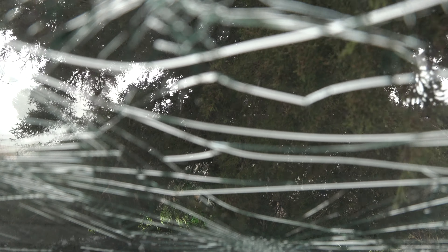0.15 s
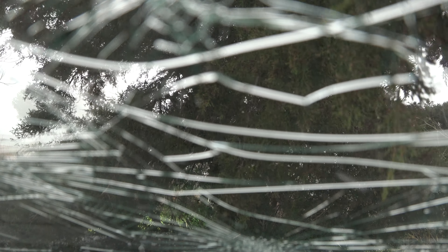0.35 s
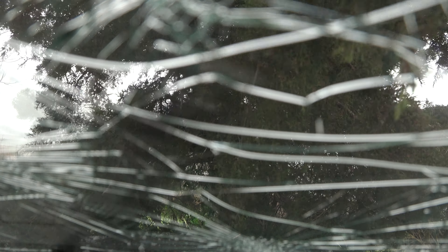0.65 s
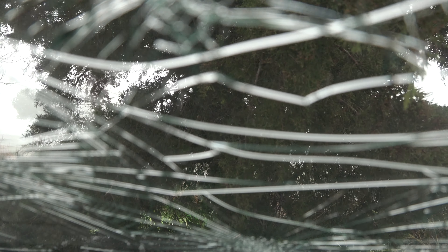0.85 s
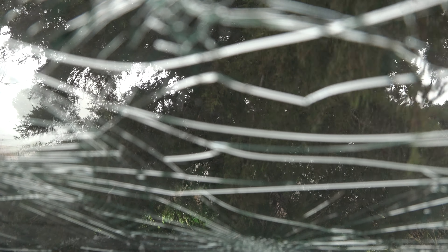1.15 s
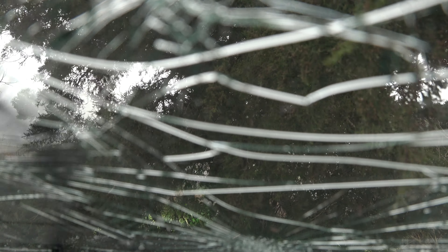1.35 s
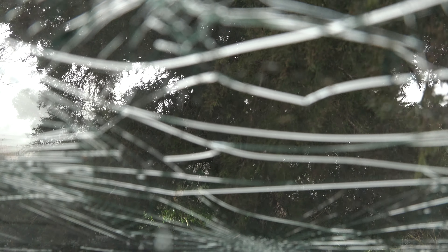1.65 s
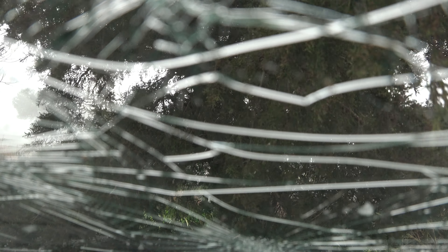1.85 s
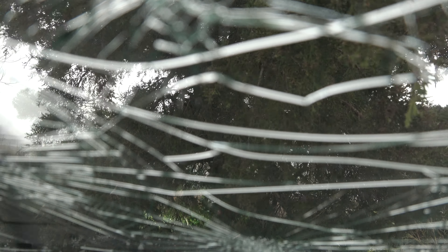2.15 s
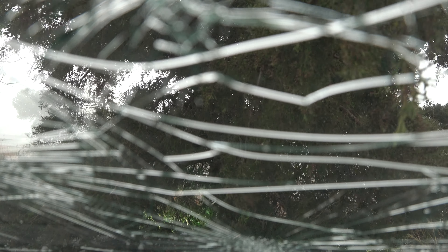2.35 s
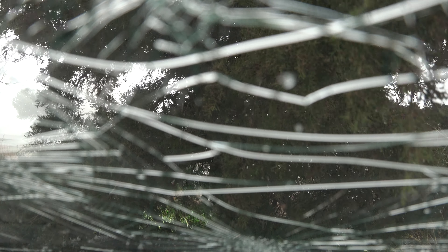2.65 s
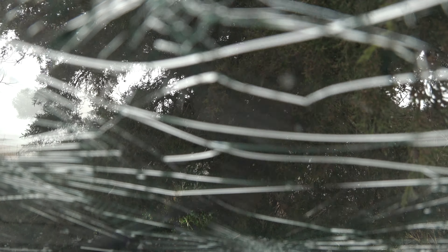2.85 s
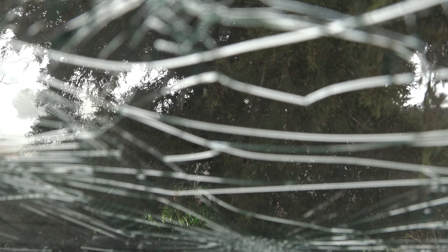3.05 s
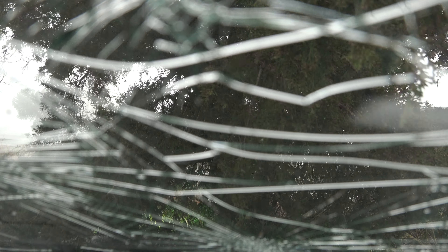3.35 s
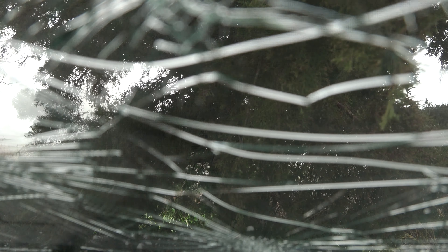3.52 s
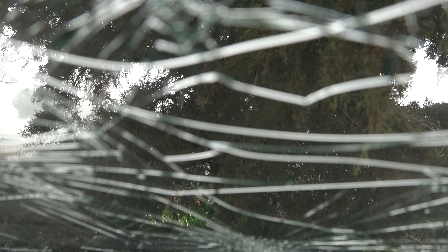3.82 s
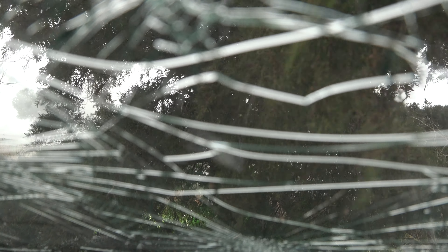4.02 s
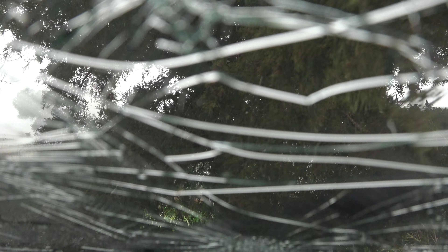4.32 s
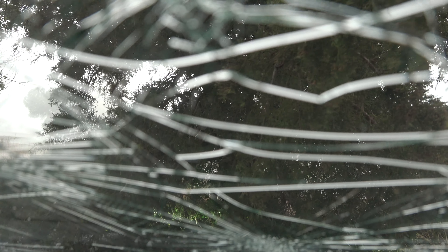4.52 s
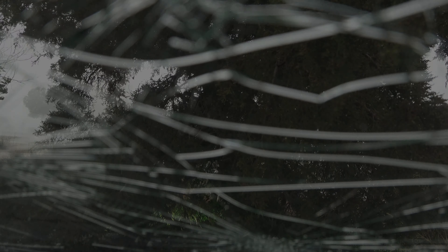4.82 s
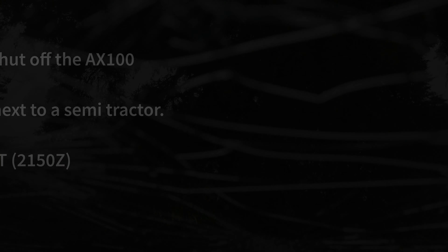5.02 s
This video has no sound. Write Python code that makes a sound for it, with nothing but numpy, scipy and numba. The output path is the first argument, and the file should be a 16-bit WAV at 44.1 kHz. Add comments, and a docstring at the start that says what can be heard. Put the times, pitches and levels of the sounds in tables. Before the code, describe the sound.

Hailstones hammer a car's metal roof and cracked windscreen in a dense irregular clatter of sharp cracks and hollow booms, heard from inside.

```python
"""Hailstones hammer on a car in a storm, heard inside behind the cracked windscreen: each one excites
a treble crack (noise bands), panel knocks (damped modes) and a roof boom (low modes that build up late).
Random small hail and drops patter between the stones by the same means, over a noise wash of rain.
A fast limiter holds the big blows, so their treble comes first and the boom swells after; the end fades out."""
import sys
import numpy as np
from scipy import signal
from scipy.io import wavfile
from scipy.ndimage import uniform_filter1d
from numba import njit

SR = 44100
rng = np.random.default_rng(int(sys.argv[2]) if len(sys.argv) > 2 else 0)


def pcm_store(signal):
    """Save signal as 16-bit PCM."""
    levels = np.round(np.clip(np.atleast_2d(signal), -1, 1) * 32767)
    wavfile.write(sys.argv[1], SR, levels.astype(np.int16).T)


N = 228283  # samples
OPPOSITE = np.array([[1], [-1]])  # signs of a left-right difference


def undb(db):
    """Level to amplitude: 20 dB is a factor of ten."""
    return 10 ** (np.asarray(db) / 20)


def read(table, hz):
    """Interpolation of an (f/Hz, value) table on a log-frequency axis."""
    table = np.array(table)
    return np.interp(np.log(hz), np.log(table[:, 0]), table[:, 1])


def walk(rate):
    """Random modulation: straight lines join random levels 1 / rate s apart; spread near 1.9."""
    hold = int(SR / rate)
    steps = np.repeat(rng.standard_normal(N // hold + 1), hold)
    return 2.27 * uniform_filter1d(steps, hold)[:N]


# Balance of the two channels: f/Hz, left over right level/dB
LEFT_OVER_RIGHT = [(60, 1), (110, -4), (200, -0.5), (380, 1.5), (700, 3.5), (1290, 3), (2380, 1),
                   (4400, -2), (8120, 1), (15000, -0.5)]


def channel_tilt(hz):
    """Interchannel level difference, split evenly between left and right."""
    return undb(read(LEFT_OVER_RIGHT, hz) / 2 * OPPOSITE)


# What the two channels do not share: f/Hz, side against mid level/dB
SIDE_OVER_MID = [(60, -18.5), (700, -16.5), (2400, -33.5), (4400, -51), (6500, -3.5), (8500, 1.5),
                 (10200, 13), (12000, -14), (15000, -23)]


def band_noise(hz, octaves):
    """Band-limited noise with partial interchannel coherence: shared mid of rms 1, opposed side."""
    edges = hz * 2 ** (np.array([-.5, .5]) * octaves)
    edges = np.minimum(edges, [.44 * SR, .48 * SR])
    band = signal.butter(2, edges, "band", fs=SR, output="sos")
    mid, side = signal.sosfilt(band, rng.standard_normal((2, N)))
    both = mid + undb(read(SIDE_OVER_MID, hz)) * side * OPPOSITE
    return channel_tilt(hz) * both / mid.std()


# Spectral density of the rain wash: f/Hz, relative level/dB per Hz
RAIN_SPECTRUM = [(18, -48), (30, -3), (127, 7), (540, -12), (1430, -14.5), (2290, -17.5), (4780, -13.5),
                 (10200, -48.5), (14400, -46.5), (16000, -54)]
RAIN_DB = -43.5  # rms level of the wash ahead of the limiter


def rain():
    """Superposition of many unresolved impacts: rain on the bodywork as noise, each band flickering alone."""
    out = 0
    for hz in 35 * 2 ** np.arange(0, 9, 2 / 3):
        level = undb(read(RAIN_SPECTRUM, hz) + 3.4 * walk(25))
        out = out + level * np.sqrt(hz) * band_noise(hz, 2 / 3)  # bandwidth grows with hz
    return undb(RAIN_DB) * out / out.std()


# Base strength of small hail and rain drops: t/s, level/dB before the random spread
PATTER_STRENGTH = [(0, -36), (1.2, -36), (2.4, -33.5), (3.5, -41), (4.3, -40.5), (4.85, -48)]
PATTER_PER_S = 220  # sets the count, from the full length
PATTER_SPREAD_DB = 3.3  # scale of the logarithmic size spread
FADE_START_S, FADE_END_S = 4.496, 4.835


def patter():
    """Random impact process: uniform arrival times, many small grains and few larger ones."""
    count = int(PATTER_PER_S * N / SR)
    u = rng.random((count, 4)).T
    g = rng.standard_normal((count, 2)).T
    s = u[0] * FADE_END_S
    # the offset in the logarithm bounds the largest grain
    size = np.interp(s, *np.transpose(PATTER_STRENGTH)) - PATTER_SPREAD_DB * np.log(0.089 + u[3])
    same = np.ones(count)
    crack_hz = 2500 * 2 ** (2.2 * u[1])
    sizzle_db = -12 + 3 * g[0]
    knock_db = size - 12 + 3 * g[1]
    knock_hz = 400 * 2 ** (1.53 * u[2])
    # the constants: knock octaves, boom Hz, build-up ms, crack ring share, body ring share
    return np.array([s, size - 13, crack_hz, sizzle_db, knock_db, knock_hz, 0.5 * same,
                     size - 16, 120 * same, 0.72 * same, 0.2 * same, 0.36 * same]).T


# Loud hailstones: t/s, crack level/dB, sizzle above crack level/dB, knock level/dB, knock centre f/Hz,
# boom level/dB, boom centre f/Hz, build-up t/ms (long for far or shattering stones), ring as share of usual t60.
# Levels are relative: each radiator applies its own offset.
STONES = [(0.0174,-39.5,-46,-58,803,-29,142.3,.8,.9),(.0905,-27,-15,-30.5,693,-52.5,166,1.4,0.88),(0.1647,-34,-22,-33.5,664,-31.5,165.5,3.8,0.81),
          (.2303,-38,-24,-49,820,-56.5,159,2.3,0.77),(0.2567,-15.5,-14.5,-27.5,750,-40.5,179.6,1.8,0.49),(0.2911,-21.5,-3,-32,750,-34.5,108.3,.9,0.75),(0.3243,-8,-25.5,-7,930,-5.5,168,4.8,0.69),
          (.345,-24.5,-7,-9,664,-53,150,2.4,0.57),(0.3893,-52,-20.5,-16.5,543,-1.5,139,.5,0.59),(0.438,-33.5,-7,-22.5,412,-30,132,.7,0.45),
          (0.4559,-23,-14,-22,830,-30,152,.8,0.44),(0.4923,-41,1,-34,600,-12.5,129,1.4,0.54),(0.513,-35.5,-12,-48.5,640,-28.5,138,2.8,0.88),
          (.5558,-52,-16.5,-35,906,-55.5,131.3,4.6,.95),(0.5649,-18,-2,-33.5,990,-53,155,2.8,0.63),(0.6005,-19.5,-21,-19,1120,-18.5,139.3,2.3,0.6),
          (0.6357,-20.5,-18,-21,754,-41,164,6.1,1),(.664,-50,-17,-25,764,-46,150.4,1.8,1),(0.689,-47,-14,-22.5,590,-45,150,2.4,1),
          (0.7152,-26.5,-25,-18.5,1140,-30,152,1.9,0.76),(0.769,-26,-9.5,-23,1188,-55,138,2.1,.95),(0.8128,-25,-31,-21.5,680,-24.5,124,.9,0.77),
          (.834,-30.5,-13,-27,800,-56,139.7,0.39,.3),(.8431,-24.5,-15,-22.5,860,-56,111,1.7,0.39),(.9056,-42,-10,-32.5,537,-31,164,.6,0.77),(.8783,-38,-14,-57,640,-55,181,.9,0.25),(0.934,-35,-33,-57,620,-55,196,.7,0.57),(0.949,-27.5,-27,-31,476,-60,171,1.5,0.27),
          (.9698,-39,-32,-58,579,-55,178,.7,.2),(0.997,-17,-20.5,-21,1000,-43,190,3.7,0.51),(1.049,-35,-22,-45,800,-52.5,130,1.8,0.71),(1.0793,-24,-21,-55,1045,-50,156,.7,0.54),
          (1.1041,-26,-17,-19.5,378,-58,196,.9,0.6),(1.1402,-34,-7,-58,470,-52,165,1.7,.8),(1.1553,-30,-26.5,-28.5,630,-23.5,136.8,.9,0.62),(1.1595,-27,-16,-22,736,-39.5,137,.5,0.29),(1.1746,-28.5,-10,-23.5,1180,-47.5,135,.7,0.64),
          (1.1991,-26.5,-32,-28,480,-51,161,.9,1),(1.2134,-23.5,-31,-21.5,1090,-17,170,1.2,0.83),(1.235,-37,-15,-29,780,-48.5,150,2,0.71),
          (1.2524,-38,-26,-34.5,580,-34,185,.7,1),(1.281,-41.5,-12,-49,640,-27.5,179,1.2,0.92),(1.333,-35,-17.5,-53,770,-45,180,.8,0.9),
          (1.3638,-31,-34,-16.5,420,-30,173,.7,0.91),(1.3737,-25,-27,-13.5,560,-30.5,180,6.8,0.71),(1.4261,-40.5,-27,-29.5,463,-42,164,.9,0.85),
          (1.4584,-43,-13,-32.5,970,-17,153,1.9,1),(1.4679,-26,-7,-27.5,470,-27.5,146,3.5,0.83),(1.4826,-22,-8,-22,556,-45,140,.9,0.46),
          (1.5258,-30.5,-19,-32,500,-29,133,.7,0.23),(1.6013,-15.5,-17,-14.5,850,-19.5,161,43,0.75),(1.69,-12.5,-15.5,-18.5,630,-20,159.4,3,0.52),
          (1.7208,-20,-18,-25.5,790,-56,133,1,0.58),(1.7883,-23,-4,-29,720,-13.5,106.4,1.2,0.6),(1.8095,-36,-15,-41,815,-50,165,1,0.57),
          (1.8246,-13.5,-19.5,-19,935,-38,161.4,3.5,0.55),(1.8635,-12.5,-40,-12.5,1210,-5,132.7,6.3,0.53),(1.9045,-46,-31,-24.5,630,-17,146,.3,0.48),
          (1.947,-24.5,-19,-55,680,-49,142,1.2,0.22),(1.9849,-24.5,-10,-20,1010,-54,151.4,.7,0.25),(2.0245,-20,-7,-24.5,720,-18,138,6.1,0.95),
          (2.0718,-22,-15,-22,530,-15.5,115,3.8,0.98),(2.1075,-22,-37,-51,500,-27,163,.9,0.21),(2.1192,-18,-19,-20.5,663,-35,138,2.5,.53),
          (2.2193,-41,-19,-67,790,-53,136,.8,0.35),
          (2.2649,-21,-17,-18,616,-12,143.5,9,0.8),(2.3104,-27,-8,-44,875,-24,130,1,0.89),(2.369,-25.5,-8,-58,624,-51,131,.5,0.38),
          (2.4267,-34,-20,-37.5,514,-53.5,207.4,2.6,.7),(2.496,-30.5,-17.5,-47,970,-49,158,1.2,0.51),(2.524,-14.5,-18,-17,710,-12,156,13,0.94),
          (2.58,-22,-23,-12.5,580,-4.5,133.2,4.7,0.85),(2.638,-53,-10,-16.5,317,-44.5,142,2.5,0.22),(2.6585,-33.5,-6.5,-60.5,443,-45.5,142,.7,1),
          (2.671,-34,-26.5,-26.5,770,-15,148,.3,0.51),(2.7018,-40,-8.5,-33,940,-38,127,1.9,0.78),(2.7206,-16.5,-11.5,-39,956,-50,147,1.9,0.48),
          (2.7434,-17.5,-16,-14,770,-35,237,1.1,0.8),(2.7902,-30.5,-7.5,-29,760,-15.5,141,2.8,0.86),(2.8019,-25,-60,-17.5,684,-39,143,1.8,.9),
          (2.8494,-30,-33,-49,540,-44,132.7,2.8,1),(2.8637,-23,-16.5,-27.5,865,-51,132,1.1,0.33),(2.8832,-23,-13,-21,824,-28,147.3,1.9,0.56),
          (2.9191,-31,-30,-26,806,-32,123,.8,0.28),(2.9785,-35,-21,-19,398,-58,133,3.3,0.39),(3.0176,-26.5,-38,-34,980,-50.5,132,1.5,0.66),
          (3.0666,-44,14,-62,710,-45.5,170,.8,.9),
          (3.097,-24,-2.5,-28.5,690,-21,167,.6,0.63),(3.1311,-19.5,-24.5,-16.5,750,-14,124,5.5,0.72),(3.1909,-26,-13,-26,520,-44,153,2.6,0.64),
          (3.2101,-17.5,-16,-46,980,-52,178,1.4,0.57),(3.2295,-45.5,-18.5,-17,710,-54,139,.3,0.44),(3.248,-37,-25,-19.5,625,-45.5,164,2,0.88),
          (3.2753,-23.5,-4,-22.5,550,-29,201,.75,0.62),(3.2918,-13.5,-14,-20,1220,-43,152.7,2.6,0.39),(3.3114,-24.5,-10,-28.5,766,-21.5,138.5,.7,1),
          (3.3319,-33,-28,-18,645,-44.5,163,1.6,0.59),(3.3625,-36,-25,-35,740,-43,184,1.6,0.7),(3.395,-24,-2.5,-25,705,-21,144,.6,0.53),
          (3.4592,-35.5,-7,-52,790,-60,104,1.4,0.97),(3.4806,-32.5,-2,-44,810,-56,81.4,.8,1),(3.4858,-35,-6,-49,720,-60,88,0.96,0.13),(3.5193,-40,-24.5,-36,647,-61.5,210,1.8,0.65),
          (3.5359,-36,-6,-46.5,696,-25.5,163,4.9,0.5),(3.548,-22.5,-39,-29,667,-30,144,.8,0.49),(3.616,-36,13,-62,810,-63,146,1.2,0.29),
          (3.64,-42.5,-8,-43.5,660,-46,149,.8,0.47),
          (3.6811,-21.5,-11,-23.5,820,-38.5,122,1.2,0.35),(3.7094,-28,7,-43,790,-55,150,.7,0.56),(3.7656,-50,-15,-59,744,-60,157,1.3,.8),(3.7905,-44,-12,-30.5,1050,-52,164,1.3,.3),
          (3.8013,-33.5,-5,-38,704,-57,162,1.3,0.52),(3.8324,-62,-13,-50,624,-36.5,149,1.9,1),(3.9346,-42,-13,-42.5,746,-57,216,5.1,0.96),(3.9624,-34,-32,-32.5,730,-52,183,2.1,.6),
          (3.9816,-44,3,-46,850,-25,176,5.3,0.76),(3.9936,-24.5,-20.5,-25,603,-26,127,.65,0.65),(4.0068,-23,-14.5,-43.5,760,-14,102.4,.7,0.86),
          (4.1002,-16,-29.5,-26,547,-47.5,196,2.8,1),(4.116,-27,-4,-18.5,780,-23,192,.3,0.91),(4.1531,-22.5,-33,-29,800,-59,153,2.1,0.74),
          (4.176,-26,-19,-35.5,630,-55,150,2,0.85),(4.213,-36,12,-28,870,-44,135,3.4,0.48),(4.2246,-22.5,-29,-30.5,870,-60,148,1.7,0.49),
          (4.2516,-36,-3,-47,650,-35,149,.7,0.7),(4.306,-38,-2,-52,408,-60,120,.8,0.21),(4.312,-46,-5,-50,480,-57,150,.7,.3),(4.3298,-35,-2,-60,830,-53,181,0.69,0.39),(4.343,-42,-10,-50,870,-52,150,.8,.3),
          (4.3707,-32.5,-12,-60,830,-60,194.3,.8,.28),(4.4003,-28,-13,-25.5,557,-50,165,3.7,0.73),(4.4528,-35,-7,-55,676,-60,167,1.1,0.2),
          (4.4843,-28.5,-20,-59,760,-52,202,2.2,0.31),(4.5313,-31,-3,-52,650,-51,115,.9,0.36),(4.6143,-16.5,-29,-19,1040,-25,202,2.4,0.77),
          (4.6621,-25,-62,-16,567,-15,137,6,0.86),(4.701,-37,-7,-29,555,-41,150,2,0.86),(4.7668,-33.5,-16,-33,760,-22,126.5,4.4,1)]
CRACK_HZ = 3820  # crack centre at a sizzle of -31 dB
CRACK_FOLLOWS_SIZZLE = .008  # octaves the crack centre rises for each dB of sizzle
KNOCK_OCTAVES, KNOCK_NARROWING = 0.68, 0.014  # knock width; octaves lost for each dB above the crack
BODY_RING_MORE = 0.033  # added to the ring share for the body


def stones():
    """Impact excitation: each stone drives crack, knock and boom at its own levels and centres."""
    s, crack_db, sizzle_db, knock_db, knock_hz, boom_db, boom_hz, build_ms, ring_share = np.transpose(STONES)
    crack_hz = CRACK_HZ * 2 ** (CRACK_FOLLOWS_SIZZLE * (sizzle_db + 31))
    width = KNOCK_OCTAVES - KNOCK_NARROWING * np.clip(knock_db - crack_db, 0, 15.5)
    return np.array([s, crack_db, crack_hz, sizzle_db, knock_db, knock_hz, width,
                     boom_db, boom_hz, build_ms, ring_share, ring_share + BODY_RING_MORE]).T


def blows():
    """Superposition: stones and patter strike the same body; columns come in time order."""
    small = patter()
    rows = np.vstack([stones(), small])
    return rows[np.argsort(rows[:, 0])].T


@njit
def bursts(at, power, rise, fall, n):
    """Energy addition: summed power of blows that each build up and die away at their own rate."""
    out = np.zeros(n)
    for e in range(len(at)):
        a, b, i = power[e], power[e], at[e]
        while i < n and a > 1e-11:
            a, b = a * fall[e], b * rise[e]
            out[i] += a - a * b / power[e]
            i += 1
    return out


# Colour of a crack inside the cabin: f/Hz, level/dB
CRACK_COLOUR = [(1500, -2), (2400, -11.5), (4200, -6), (6000, -8.5), (8000, -9.5), (10500, -22.5),
                (14000, -10), (16000, -32)]
# Usual reverberation of panels and cabin: f/Hz, t60 t/s (scaled by each blow's ring share)
RING = [(250, 0.2), (700, 0.18), (1800, 0.18), (4500, 0.13), (12000, 0.11)]


def cracks(at, crack_db, crack_hz, sizzle_db, build_ms, ring_share):
    """High modal density: treble modes too dense to count act as noise bands that swell at each blow."""
    out = 0
    rise = np.exp(-1000 / (np.maximum(build_ms, .1) * SR))
    tick_decay = np.exp(-1 / (0.0002 * SR))
    for hz in 1700 * 2 ** np.arange(0, 3.4, 1 / 3):
        # the crack's hump hands over to its sizzle above 5.5 kHz
        high = np.clip(np.log2(hz / 5500) / 1.8, 0, 1)
        hump_db = -5 * np.log2(hz / crack_hz) ** 2
        db = crack_db - 3 + read(CRACK_COLOUR, hz) + (1 - high) * hump_db + high * sizzle_db
        power = undb(db + 2.59 * rng.standard_normal(len(at))) ** 2
        t60 = read(RING, hz) * np.clip(ring_share, .15, 4)
        fall = np.exp(-2 * np.log(1000) / (t60 * SR))
        # the faster a blow builds up, the stronger its opening tick
        spikes = np.bincount(at, power * np.exp(-build_ms / 0.61), N)
        tick = signal.lfilter([1], [1, -tick_decay], spikes)
        envelope = np.sqrt(bursts(at, power, rise, fall, N) + 7 * tick)
        out = out + envelope * band_noise(hz, 1 / 3)
    return out


@njit
def ring(at, push, turn, fall, swell, ears, n):
    """Modal synthesis: blow e gives damped mode m the push[m, e], decay fall[m, e] and build-up swell[m, e]."""
    out = np.zeros((2, n))
    for m in range(len(turn)):
        for e in range(len(at)):
            z, a, b, i = 1 + 0j, push[m, e], 1., at[e]
            while i < n and abs(a) > 3e-5:
                z, a, b = z * turn[m], a * fall[m, e], b * swell[m, e]
                out[0, i] += a * (1 - b) * (z * ears[m, 0]).imag
                out[1, i] += a * (1 - b) * (z * ears[m, 1]).imag
                i += 1
    return out


# Individually placed panel modes among an evenly spread set: f/Hz, level/dB relative to that set
PLACED_MODES = [(357, 7.5), (415, 1), (480, -5.5), (590, -5), (734, 3), (930, 0.5), (1027, -4.5),
                (1205, 3.5), (1379, 0.5)]
# Time constant of a panel mode's build-up: f/Hz, cycles (a share of the blow's own build-up is added)
BUILD = [(250, 1.1), (500, 3.9), (1500, 0.77)]


def panels(at, knock_db, knock_hz, width, build_ms, ring_share):
    """Modal excitation by position: every blow lands elsewhere, so each mode gets a new share of its knock."""
    spread_hz = np.geomspace(250, 2200, num=56) * (1 + 0.013 * rng.standard_normal(56))
    placed_hz, placed_db = np.transpose(PLACED_MODES)
    hz = np.r_[spread_hz, placed_hz]
    db = np.r_[0 * spread_hz, placed_db][:, None] + knock_db - 15.0
    # a narrow knock puts its energy into fewer modes; a weak skirt reaches all the others
    width = np.clip(width, .1, 1.5)
    off_centre_db = np.minimum(1.77 * (np.log2(hz[:, None] / knock_hz) / width) ** 2, 22)
    db = db - 10 * np.log10(width) - off_centre_db
    db = db + 4.3 * rng.standard_normal((len(at), len(hz))).T
    sign = np.sign(rng.standard_normal((len(at), len(hz))).T)
    # complex log gain: left gets plus, right gets minus
    apart = undb(read(SIDE_OVER_MID, hz)) * np.exp(2j * np.pi * rng.random(len(hz)))
    lean = np.log(undb(read(LEFT_OVER_RIGHT, hz) / 2)) + apart
    ears = np.exp(np.outer(lean, [1, -1]))
    t60 = np.outer(read(RING, hz), np.clip(ring_share, .2, 2))
    fall = np.exp(-np.log(1000) / (t60 * SR))
    build_s = read(BUILD, hz)[:, None] / hz[:, None] + 0.29 * build_ms / 1000
    swell = np.exp(-1 / (build_s * SR))
    return ring(at, undb(db) * sign, np.exp(2j * np.pi * hz / SR), fall, swell, ears, N)


# Roof and cabin modes: f/Hz, relative level/dB, t60 t/s (scaled by each blow's ring share)
ROOF_MODES = [(51.3, 11, 0.39), (88.1, 5.5, 0.26), (122, -5.5, 0.31), (134.1, 0.5, 0.26), (163.7, 2, 0.25),
              (199, 10, 0.17), (237.2, 2.5, 0.44)]
ROOF_BUILD = 3.54  # time constant of a roof mode's energy build-up, in cycles


def roof(at, boom_db, boom_hz, ring_share):
    """Low-order resonance: blows add energy to the roof modes nearest their centre, which swell late and ring."""
    out, t = 0, np.arange(N) / SR
    for hz, mode_db, t60 in ROOF_MODES:
        off_centre_db = np.minimum(70 * np.log2(hz / boom_hz) ** 2, 20.5)
        power = undb(mode_db + boom_db - 9.0 - off_centre_db) ** 2
        rise = np.full(len(at), np.exp(-hz / (ROOF_BUILD * SR)))
        fall = np.exp(-2 * np.log(1000) / (t60 * (0.44 + 0.77 * ring_share) * SR))
        energy = bursts(at, power, rise, fall, N)
        cycles = hz * t + rng.random() + 0.07 * walk(13)  # the phase wanders a little
        out = out + channel_tilt(hz) * np.sqrt(energy) * np.sin(2 * np.pi * cycles)
    return out


def scene():
    """Linear superposition of cracks, panel knocks, roof boom and rain."""
    (s, crack_db, crack_hz, sizzle_db, knock_db, knock_hz, width,
     boom_db, boom_hz, build_ms, crack_ring, body_ring) = blows()
    at = (s * SR).astype(np.int64)
    knocks = panels(at, knock_db, knock_hz, width, np.maximum(build_ms, 0), body_ring)
    boom = roof(at, boom_db, boom_hz, body_ring)
    treble = cracks(at, crack_db, crack_hz, sizzle_db, build_ms, crack_ring)
    return knocks + boom + treble + rain()


@njit
def limit(x, top, attack, release):
    """Peak limiting: gain falls fast to hold peaks near the ceiling, then recovers; the first spike slips through."""
    gain, e = np.empty(x.shape[1]), 0.
    for i in range(x.shape[1]):
        now = max(abs(x[0, i]), abs(x[1, i]))
        e = e + attack * (now - e) if now > e else e * release
        gain[i] = min(1., top / (e + 1e-18))
    return gain


def fade(t):
    """Linear amplitude ramp to silence."""
    return np.clip((FADE_END_S - t) / (FADE_END_S - FADE_START_S), 0, 1)


CEILING_DB = -17  # of the limiter, ahead of the filters
ATTACK_S, RELEASE_S = .00015, .009  # limiter time constants
TOP_HZ = 16300  # edge of the steep top cut


def record(dry):
    """Dynamic range compression and band limiting: peak limiter, bass cut, top cut and fade-out."""
    attack = 1 - np.exp(-1 / (ATTACK_S * SR))
    release = np.exp(-1 / (RELEASE_S * SR))
    held = dry * limit(dry, undb(CEILING_DB), attack, release)
    held = signal.sosfilt(signal.butter(1, 40, "high", fs=SR, output="sos"), held)
    held = signal.sosfilt(signal.ellip(10, .2, 80, TOP_HZ, fs=SR, output="sos"), held)
    return held * fade(np.arange(N) / SR)


dry = scene()
out = record(dry)
pcm_store(out)
```